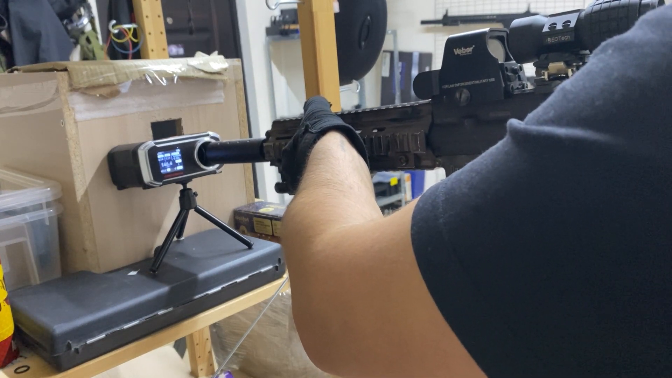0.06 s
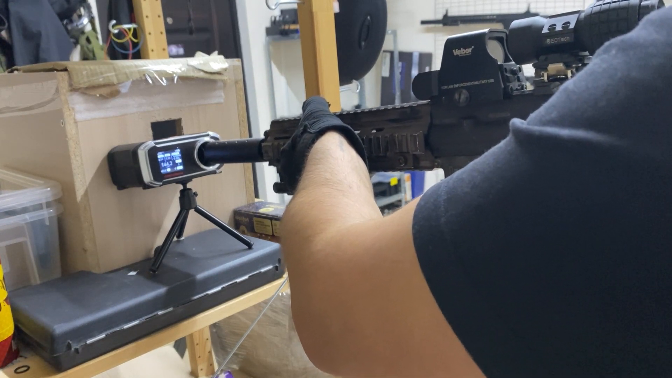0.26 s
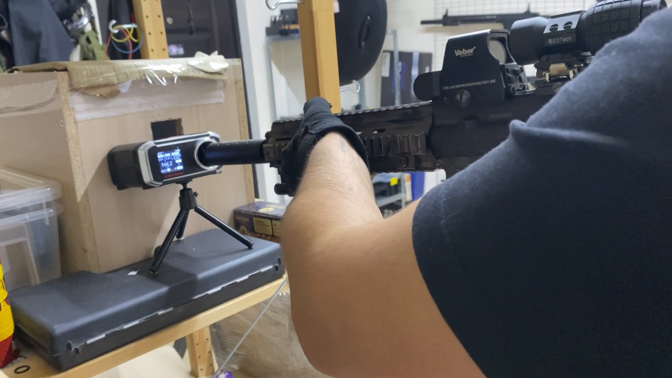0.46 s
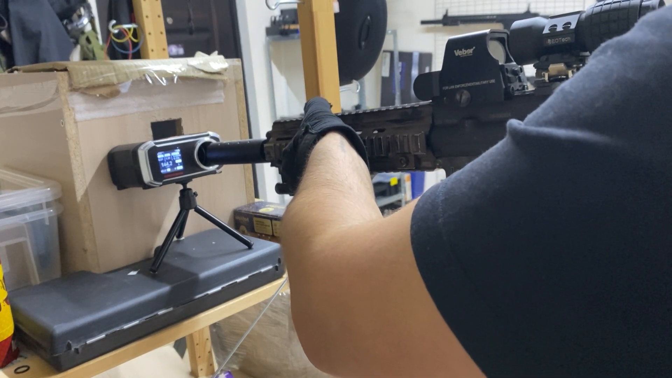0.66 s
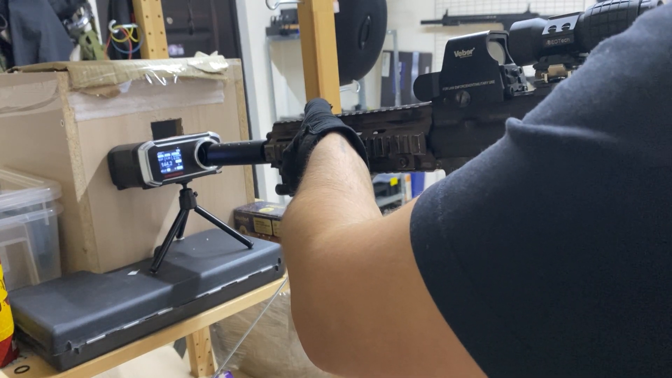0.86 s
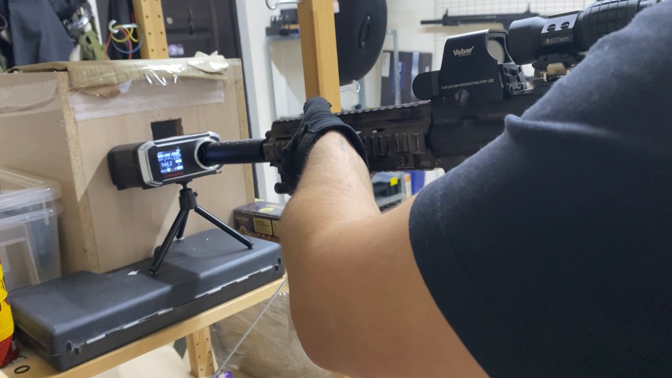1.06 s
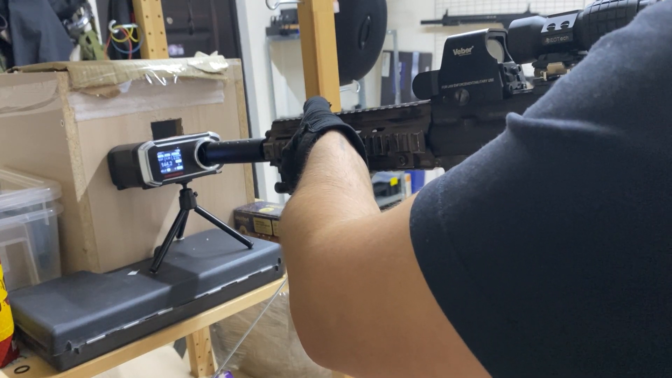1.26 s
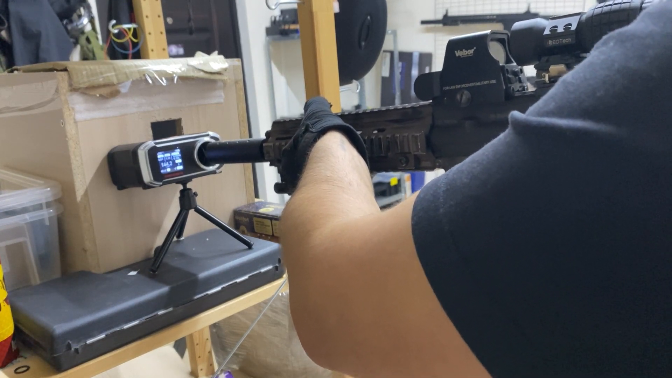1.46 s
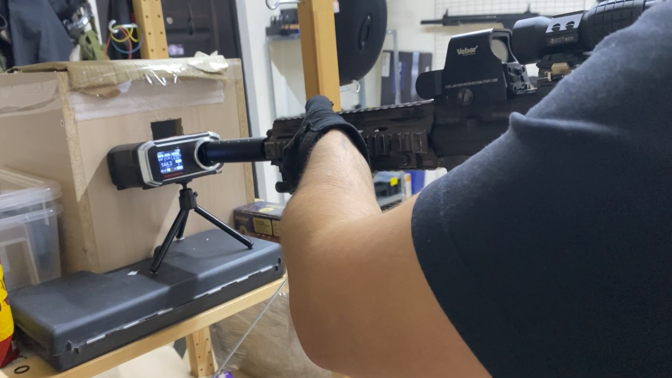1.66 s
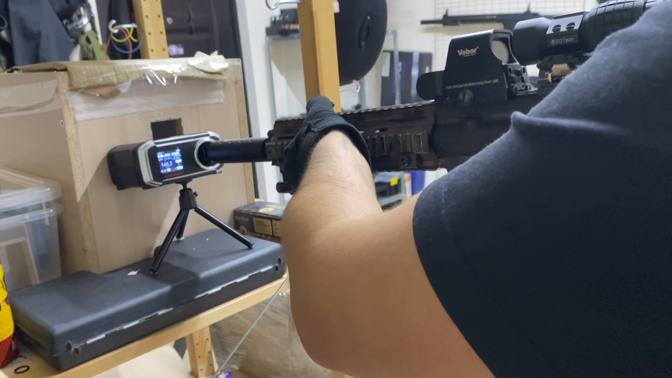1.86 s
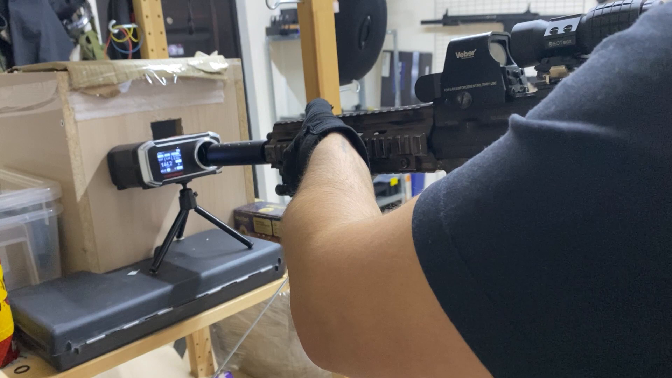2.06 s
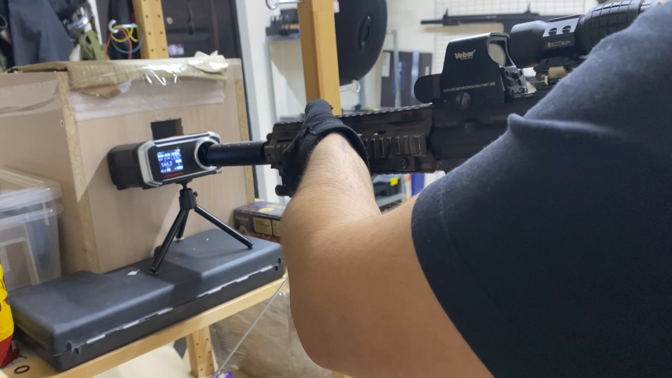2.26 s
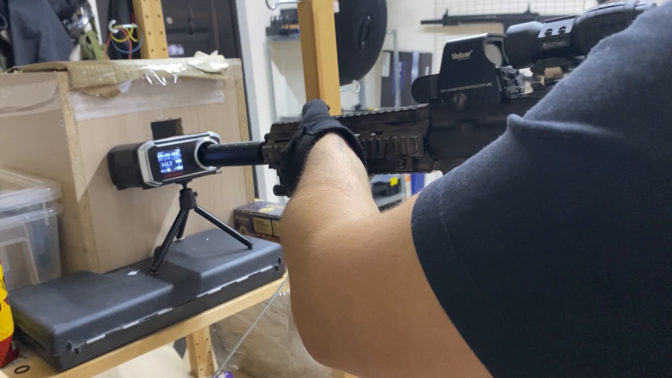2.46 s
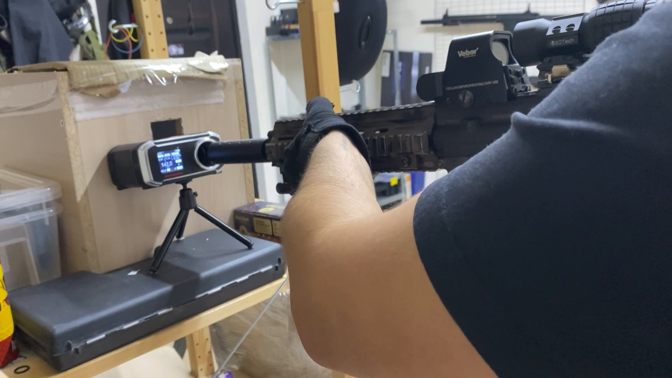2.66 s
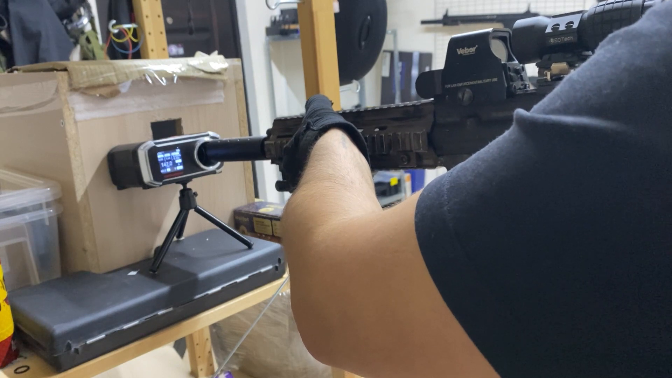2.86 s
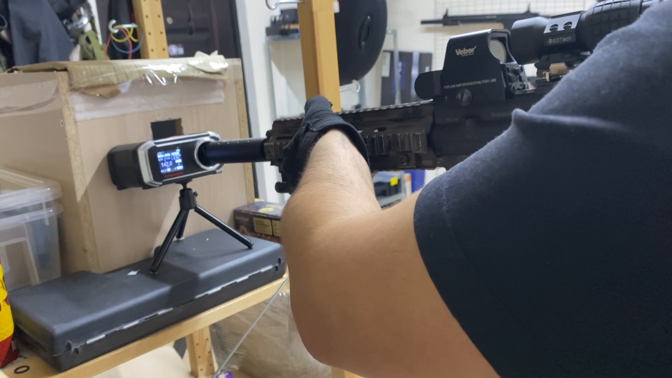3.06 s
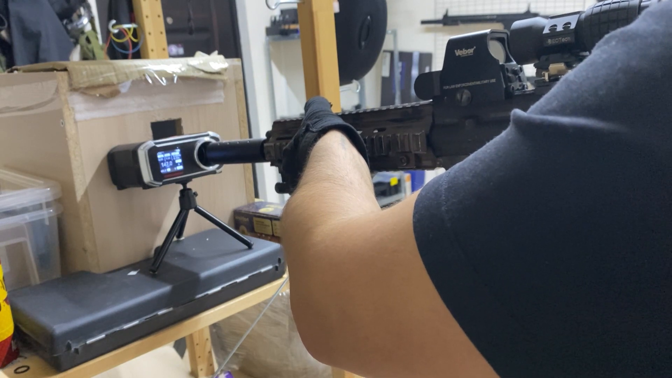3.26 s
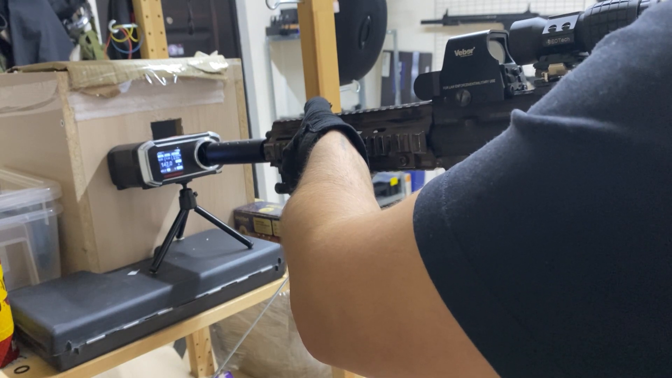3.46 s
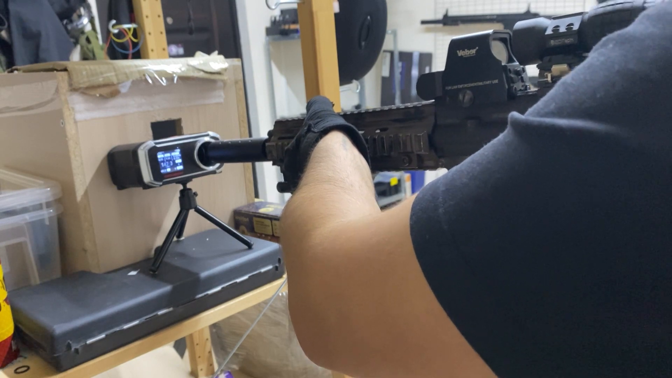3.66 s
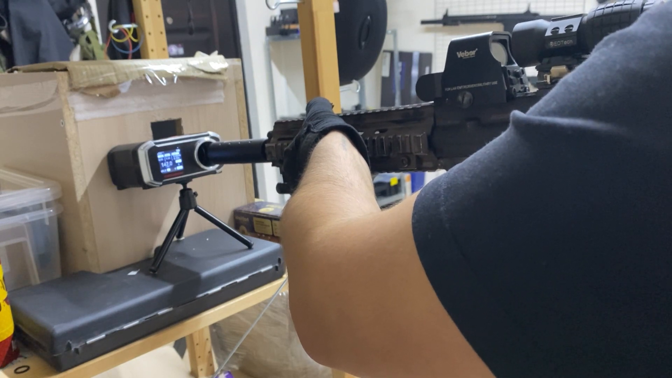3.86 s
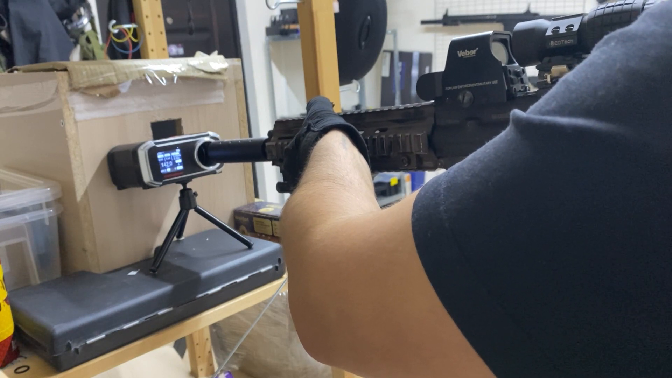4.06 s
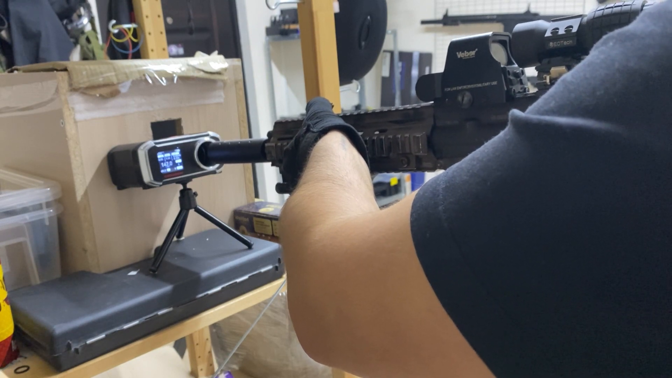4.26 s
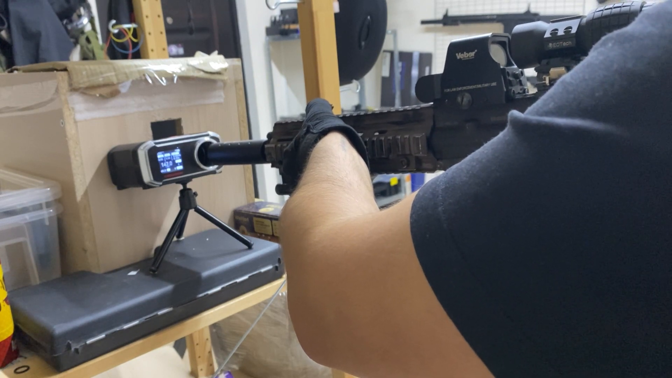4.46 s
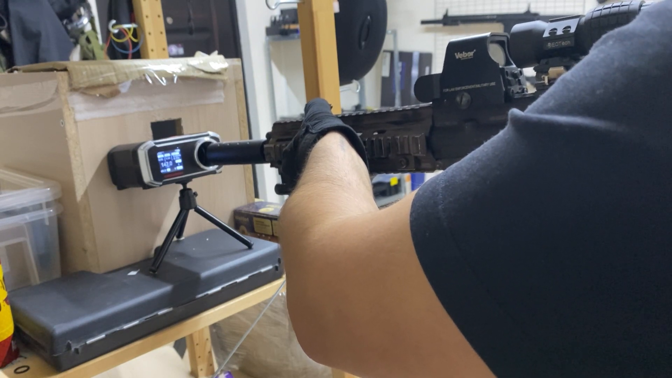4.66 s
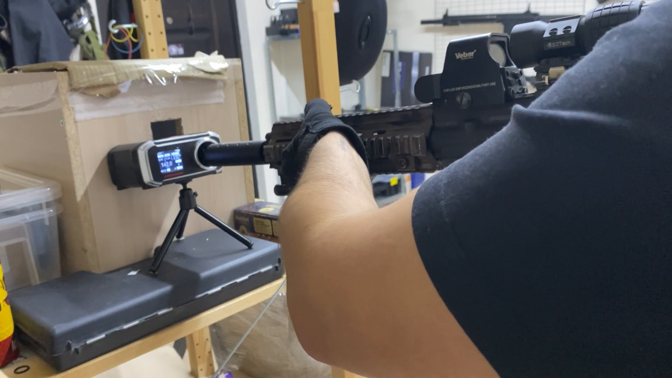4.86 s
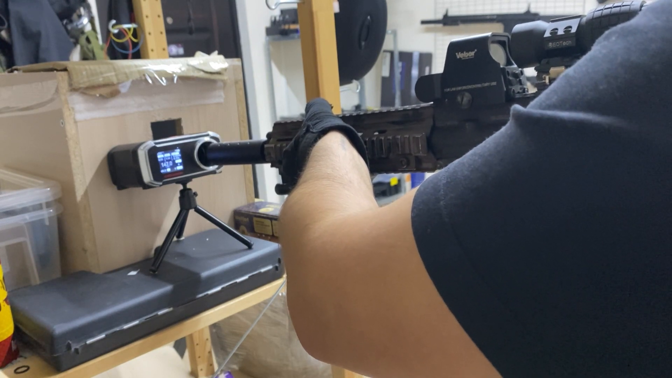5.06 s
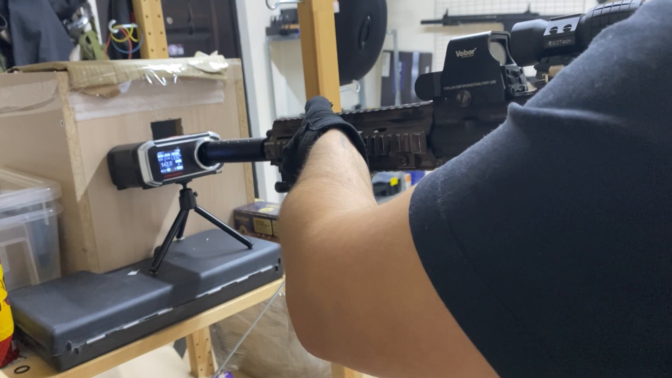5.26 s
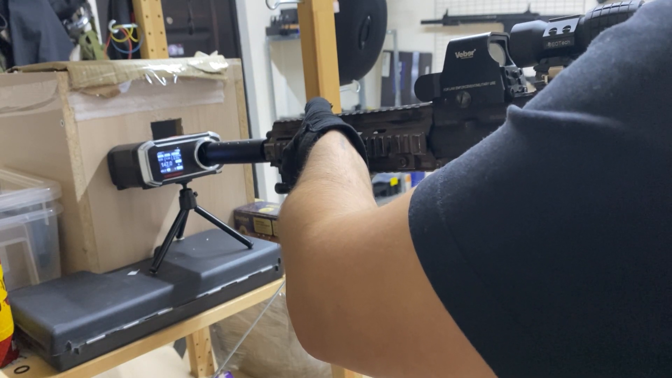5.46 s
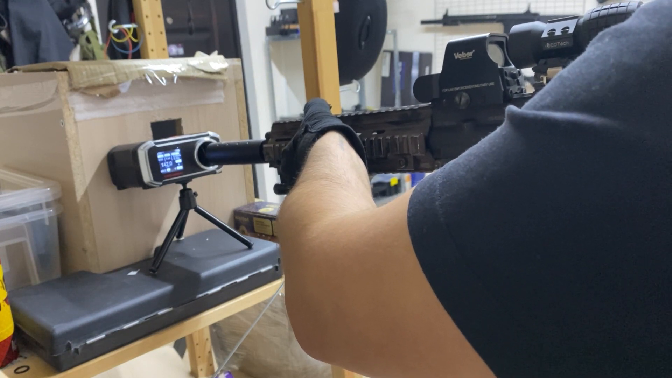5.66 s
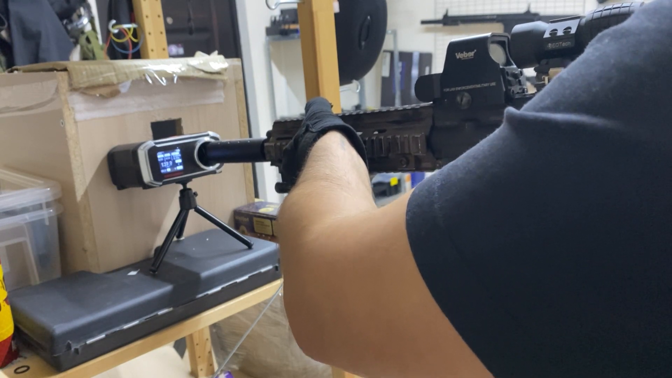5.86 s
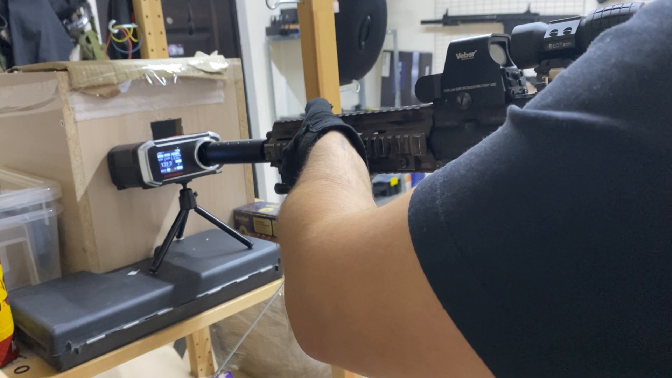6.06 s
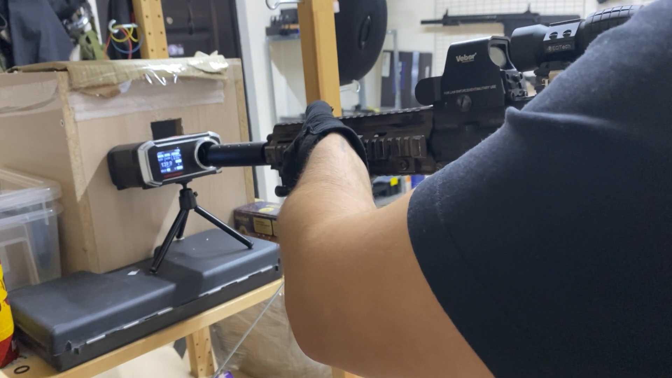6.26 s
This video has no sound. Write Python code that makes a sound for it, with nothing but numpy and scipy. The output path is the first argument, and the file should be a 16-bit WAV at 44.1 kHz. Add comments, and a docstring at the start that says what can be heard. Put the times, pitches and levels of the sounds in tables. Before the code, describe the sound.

A gas blowback replica rifle cracks six times at a steady pace, close up, each shot clattering metallically over a very faint low hum.

```python
"""In a small workshop, a gas blowback airsoft rifle fires six single shots close to a hand-held phone.
Shaped noise gives the sear's click and scrape, the hammer's blow, the gas hiss and the bolt's two impacts.
Decaying sines ring as the steel, brief sine bursts make the muzzle pop, and deeper sines make the kick.
The room answers with decaying noise and a deep swelling mode. Behind it lie still air, handling rumble
and a faint mains hum. Two microphone ports, a low cut and gain control shape the pickup."""
import sys
import numpy as np
from scipy import signal
from scipy.fft import rfft, irfft, next_fast_len
from scipy.io import wavfile
from scipy.ndimage import uniform_filter1d, minimum_filter1d, map_coordinates

SR = 44100
rng = np.random.default_rng(int(sys.argv[2]) if len(sys.argv) > 2 else 0)


def waveform_to_disk(signal):
    """Save audio, clipped to [-1, 1], as 16-bit WAV at the path in sys.argv[1]."""
    frames = np.transpose(np.atleast_2d(signal))
    scaled = np.clip(frames, -1, 1) * 32767
    samples = np.round(scaled).astype(np.int16)
    wavfile.write(sys.argv[1], SR, samples)


N = 278712  # samples in all
SPAN = SR  # samples allowed for one shot

# All levels are relative: mixing gains, the low cut and the gain control follow.
# Shots: hammer blow t/s, bolt cycle t/s, hammer level/dB, muzzle pop level/dB,
# kick level/dB as the bolt sets off, kick level/dB as it comes home
SHOTS = [(0.1606, .0692, -4.5, -0.5, -16.5, -39.5), (1.363, .0679, -9, -3.5, -28, -28.5),
         (2.4826, .0685, -9, -1.5, -34, -35.5), (3.6378, .0685, -8, -3, -30, -38),
         (4.7320, .0683, -6.5, -2, -29.5, -43.5), (5.8215, .0701, -7.5, -1.5, -30, -38)]
# Noise colour of the sear's click and scrape: f/Hz, level/dB (density per Hz)
SEAR_COLOUR = [(100, -12), (550, -0.5), (1100, -3), (1500, 5), (2100, -2.5), (3400, 1.5), (5200, -10),
               (9000, -4), (15500, -8.5)]
# Noise colour of the hammer on the valve: f/Hz, level/dB (density per Hz)
HAMMER_COLOUR = [(60, -15), (300, -11), (650, -1.5), (950, -5.5), (1400, 10), (1900, 2.5), (2500, 1),
                 (3500, -2), (5000, -13.5), (6500, -2.5), (9500, -10), (12000, -9.5), (15500, -9.5)]
# Noise colour of the gas hiss: f/Hz, level/dB (density per Hz)
GAS_COLOUR = [(100, -5), (400, 1), (900, -7.5), (1600, -1), (5000, -4.5), (7000, -0.5), (8500, -0.5),
              (10500, -0.5), (11800, -4), (13100, -1.5), (14300, -4.5), (15500, -4.5)]
# Noise colour of the bolt on its rear stop: f/Hz, level/dB (density per Hz)
BOLT_COLOUR = [(60, -15), (230, 1.5), (480, 2.5), (850, -6), (1600, 0.5), (2100, -7), (3300, 0), (4150, 7),
               (4900, -2.5), (8200, 4.5), (11000, -2.5), (15500, -7.5)]
# Noise colour of the bolt slamming home: f/Hz, level/dB (density per Hz)
BREECH_COLOUR = [(60, -14), (170, -2), (600, 1.5), (950, 1.5), (1600, 1.5), (2500, -0.5), (4400, 2),
                 (6500, 2), (10000, 0), (11500, -1.5), (15500, -4)]
# Modes of bolt and receiver, with the buffer's loud, brief clack near 4 kHz: f/Hz, level/dB, t60/s
STEEL_MODES = [(1610, -9, .55), (3060, -12, .35), (3175, -10, .35), (3950, 13, .055), (4005, -2, .26),
               (4110, 11, .04), (4177, -2, .25), (4240, 13, .05), (4318, -3, .26), (4404, -6, .2),
               (4748, -32, .9), (5759, 0, .26), (6560, -7, .28), (11125, -11, .28), (11720, -10, .28),
               (12918, -6, .22), (13093, -4, .27)]
# Time in which the workshop's answer falls by 60 dB: f/Hz, t60/s
ROOM_T60 = [(60, 0.65), (160, .6), (350, .38), (700, .42), (1500, 0.52), (4200, 0.5), (8000, 0.44),
            (15000, 0.47)]
# Colour of the workshop's answer: f/Hz, level/dB
ROOM_GAIN = [(50, -2.5), (100, -1), (150, 6.5), (205, -2.5), (260, 5.5), (400, -2.5), (700, -1),
             (950, -0.5), (1600, -1.5), (2100, -1.5), (3200, 1), (4150, 2.5), (5200, 1.5), (14000, -4)]
# Noise colour of the workshop's still air: f/Hz, level/dB (density per Hz)
AIR_COLOUR = [(20, -37), (33, -24), (44, 3.5), (54, 1), (72, -8.5), (100, -7.5), (125, -16), (165, -12),
              (220, -24), (400, -33.5), (1100, -35), (2500, -51.5), (6000, -65)]
# Noise colour of the handling rumble: f/Hz, level/dB (density per Hz)
RUMBLE_COLOUR = [(20, -26), (45, 0.5), (60, 1), (80, -9.5), (105, -0.5), (170, -15.5), (300, -33),
                 (1000, -40), (4000, -67.5)]
# Likeness of the two microphone ports: f/Hz, correlation (1 = the same)
PORT_LIKENESS = [(100, .97), (350, .6), (1000, .3), (3200, .45), (5000, .25), (7000, .5), (9000, .94),
                 (10700, .7), (12500, .9), (14200, .7), (15400, .93)]
# Phase by which the left port leads the right: f/Hz, lead/rad
PORT_LEAD = [(200, -.2), (3500, -.2), (6700, .4), (7700, 1.9), (9100, 3.1), (12100, 6.1), (12800, 6.5),
             (14700, 9), (15500, 9.4)]
# Balance of the ports: f/Hz, left minus right level/dB
PORT_LEAN = [(100, 1), (330, -5.5), (700, -2.5), (2000, -1.5), (4200, -4.5), (7000, 0.5), (12000, -0.5)]

SWING_S = .0125  # from the sear's release to the hammer's blow
REAR_SHARE = .332  # share of its cycle after which the bolt reaches the rear stop
BOTTOM_S = .0042  # from meeting the buffer to bottoming out
GAS_DB, REAR_DB, HOME_DB = -11, -7, -10  # gas hiss, rear stop, slam home: the same in every shot
BOOM_HZ, BOOM_DB, BOOM_RISE_S, BOOM_T60_S = 51.7, -44, 0.22, 1.4
JOSTLE_S, JOSTLE_DB, JOSTLE_T60_S, STEADY_HAND_DB = .2, -51, .9, -76.5
TOP_HZ = 15500  # the sound ends above this frequency


def hammer():
    """The hammer knocks the valve open: returns a very short burst of noise and the steel's ring."""
    out, ring = np.zeros((2, 2, N))
    for (s, _, db, *_), blow in zip(SHOTS, clatter(HAMMER_COLOUR, same=.5)):
        add(out, s, amp(db) * blow * fade(t60=.02, rise=.0001))
        add(ring, s, amp(db - 28.5) * steel())
    return out, ring


def bolt():
    """The bolt meets its buffer, bottoms out, and is driven home by the spring: clatter and ring."""
    out, ring = np.zeros((2, 2, N))
    bottoming = amp(-2) * fade(t60=.025, rise=.0003, delay=BOTTOM_S)
    stop = fade(t60=.014, rise=.0002) + bottoming
    slam = fade(t60=.034, rise=.0005)
    rear_noise = clatter(BOLT_COLOUR, same=0.81)
    home_noise = clatter(BREECH_COLOUR, same=0.2)
    for (s, cycle, *_), at_rear, at_home in zip(SHOTS, rear_noise, home_noise):
        rear, home = s + REAR_SHARE * cycle, s + cycle
        add(out, rear, amp(REAR_DB) * at_rear * stop)
        for blow in (rear, rear + BOTTOM_S):
            add(ring, blow, amp(REAR_DB - 23) * steel())
        add(out, home, amp(HOME_DB) * at_home * slam)
        add(ring, home, amp(HOME_DB - 27) * steel())
    return out, ring


def steel():
    """One blow on the steel: decaying modes with newly drawn strengths and phases."""
    t = np.arange(SPAN) / SR
    hz, db, t60 = np.transpose(STEEL_MODES)[:, :, None]
    size = amp(db + rng.normal(0, 1.3, db.shape) - 60 * t / t60)
    phase = np.exp(2j * np.pi * rng.random((2, len(STEEL_MODES))))  # left and right drawn apart
    return (phase @ (size * np.exp(2j * np.pi * hz * t))).imag


def muzzle(pop_hz, width, delay, left_lead, left_db, box_delay, box_db, wall_delay, wall_hz, wall_db):
    """A short hollow pop of gas, thrown back to the left by the target box and, thinner, by a near wall."""
    out = np.zeros((2, N))
    t = np.arange(SPAN) / SR

    def pop(at, hz):
        """A sine burst under a bell-shaped envelope centred at `at` seconds."""
        return np.exp(-.5 * ((t - at) / width) ** 2) * np.sin(2 * np.pi * hz * (at - t))

    for s, _, _, pop_db, *_ in SHOTS:
        hz = pop_hz * (1 + rng.normal(0, 0.045))
        right = pop(delay, hz)
        box = amp(box_db) * pop(delay + box_delay, hz)
        left = amp(left_db) * pop(delay - left_lead, hz) + box
        wall = amp(wall_db) * pop(delay + wall_delay, wall_hz)
        add(out, s, amp(pop_db) * (np.array([left, right]) + wall))
    return out


def gas():
    """Escaping gas hisses: coloured noise that rises quickly and dies away."""
    out = np.zeros((2, N))
    for (s, *_), hiss in zip(SHOTS, clatter(GAS_COLOUR, same=0.37)):
        add(out, s, amp(GAS_DB) * hiss * fade(t60=0.14, rise=0.0024))
    return out


def sear():
    """The sear clicks, then the scrape of the hammer grows as it gathers speed, up to its blow."""
    out = np.zeros((2, N))
    t = np.arange(SPAN) / SR
    click = amp(-35.5) * fade(t60=0.066, rise=0.0027)
    scrape = amp(-17) * np.exp(-np.abs(t - SWING_S) / 0.0022) * (t < SWING_S)
    for s, *_ in SHOTS:
        add(out, s - SWING_S, (click + scrape) * noise(SEAR_COLOUR, SPAN))
    return out


def recoil(thump_hz, knock_hz, knock_db, lag):
    """The rifle kicks as the bolt sets off and comes home: a deep thump and a higher knock, both short."""
    out = np.zeros((2, N))
    t = np.arange(SPAN) / SR
    thump = np.sin(2 * np.pi * thump_hz * t) * fade(t60=.065, rise=0.0048)
    knock = np.sin(2 * np.pi * knock_hz * t) * fade(t60=0.087, rise=0.0036)
    kick = thump - amp(knock_db) * knock
    for s, cycle, _, _, off_db, home_db in SHOTS:
        add(out, s + lag, amp(off_db) * kick)
        add(out, s + cycle + lag, amp(home_db) * kick)
    return out


def room(x, build):
    """The workshop's answer builds up, then each frequency dies at its own speed; tails vary by shot."""
    out = np.zeros((2, N))
    sent = filtered(x, lambda hz: amp(along(ROOM_GAIN, hz)))
    onset = 1 - np.exp(-np.arange(SPAN) / SR / build)
    for s, *_ in SHOTS:
        # one noise tail for each way from an input channel to an output channel
        hz, t, bands = signal.stft(rng.standard_normal((2, 2, SPAN)), SR, nperseg=256)
        decay = amp(-60 * t / along(ROOM_T60, hz)[:, None])
        tails = signal.istft(bands * decay, SR, nperseg=256)[1][..., :SPAN]
        tails = unit(tails * onset) / np.sqrt(2 * SPAN)
        shot = sent[:, None, round((s - SWING_S) * SR):][..., :SPAN // 2]
        add(out, s - SWING_S, signal.fftconvolve(shot, tails, axes=2).sum(axis=0))
    return out


def boom():
    """The room's lowest mode, woken by every shot, swells and slowly dies."""
    out = np.zeros((2, N))
    tone = np.sin(2 * np.pi * BOOM_HZ * np.arange(SPAN) / SR)
    mode = tone * fade(t60=BOOM_T60_S, rise=BOOM_RISE_S)
    for s, *_ in SHOTS:
        add(out, s, amp(BOOM_DB) * mode)
    return out


def handling():
    """The hand on the phone rumbles: low noise that holds, then dies away to a steady grip."""
    settling = np.maximum(np.arange(N) / SR - JOSTLE_S, 0)
    strength = amp(STEADY_HAND_DB) + amp(JOSTLE_DB - 60 * settling / JOSTLE_T60_S)
    return strength * noise(RUMBLE_COLOUR, N)


def hum(mains_hz, hum_db, waver_db):
    """An appliance hums at twice the mains frequency, its level wavering a little."""
    t = np.arange(N) / SR
    # four random points a second, smoothly joined
    waver = map_coordinates(rng.standard_normal(N // SR * 4 + 8), [t * 4])
    return amp(hum_db + waver_db * waver) * np.sin(2 * np.pi * 2 * mains_hz * t)


def background():
    """Still air as steady coloured noise, with the handling rumble and the mains hum."""
    air = amp(-62.5) * noise(AIR_COLOUR, N)
    return ports(air + handling()) + hum(mains_hz=50.7, hum_db=-62, waver_db=1.04)


def ports(pair):
    """Two unrelated signals become what the phone's two microphone ports pick up."""
    def spread(hz):
        """Mixing angle that gives the ports their likeness."""
        turn = np.arccos(np.clip(along(PORT_LIKENESS, hz), -1, 1)) / 2
        return np.array([np.cos(turn), np.sin(turn)])

    def offset(hz):
        """Half of the level and phase difference on each port."""
        half = np.array([[.5], [-.5]])
        return amp(half * along(PORT_LEAN, hz)) * np.exp(1j * half * along(PORT_LEAD, hz))

    mid, side = filtered(pair, spread)
    return filtered(np.array([mid + side, mid - side]), offset)


def clatter(spectrum, same):
    """Dense vibration of one part, for each shot: partly the same every time, partly new."""
    own = noise(spectrum, SPAN)
    return [np.sqrt(same) * own + np.sqrt(1 - same) * noise(spectrum, SPAN) for _ in SHOTS]


def amp(db):
    """Decibels to gain."""
    return 10 ** (np.asarray(db) / 20)


def unit(x):
    """x at rms 1."""
    return x / np.sqrt(np.mean(x ** 2) + 1e-20)


def along(points, hz):
    """(f/Hz, value) points read on a log frequency axis."""
    f, v = np.transpose(points)
    return np.interp(np.log(hz + 1), np.log(f + 1), v)


def filtered(x, response):
    """x times a response of frequency."""
    n = x.shape[-1]
    m = next_fast_len(n + 8192)
    return irfft(rfft(x, m) * response(np.fft.rfftfreq(m, 1 / SR)), m)[..., :n]


def noise(spectrum, size):
    """Two unrelated noises in one colour, at rms 1 overall."""
    return unit(filtered(rng.standard_normal((2, size)), lambda hz: amp(along(spectrum, hz))))


def fade(t60, rise, delay=0):
    """An envelope that waits, rises and dies away; all times in s."""
    t = np.maximum(np.arange(SPAN) / SR - delay, 0)
    return (1 - np.exp(-t / rise)) * amp(-60 * t / t60)


def add(track, s, sound):
    """Mix a sound into a track at s seconds."""
    part = track[:, round(s * SR):][:, :sound.shape[-1]]
    part += sound[..., :part.shape[-1]]


def scene():
    """The rifle close by, its room and the quiet background."""
    hammer_noise, hammer_ring = hammer()
    bolt_noise, bolt_ring = bolt()
    metal = hammer_noise + bolt_noise + gas() + sear()
    ring = hammer_ring + bolt_ring
    # times in s
    pop = muzzle(pop_hz=424, width=.0011, delay=.0052, left_lead=0.00036, left_db=-3.5,
                 box_delay=.0031, box_db=-8.5, wall_delay=0.014, wall_hz=664, wall_db=-17.5)
    kick = amp(7.5) * recoil(thump_hz=63, knock_hz=150.5, knock_db=-3, lag=.005)
    wet = amp(-4.5) * room(metal + amp(-5.5) * pop + amp(-13.5) * kick, build=0.0037)
    rifle = ports(metal + ring + wet) + pop + kick
    return amp(1) * rifle + boom() + background()


def gain_control(x, limit_db, hold, release):
    """The phone turns loud sound down at once, holds (s), then lets the gain come back (s)."""
    level = np.sqrt(np.abs(uniform_filter1d(np.mean(x ** 2, axis=0), size=256)) + 1e-12)
    need = np.minimum(1, amp(limit_db) / level)
    h, r = int(hold * SR / 2), int(release * SR / 2)
    # the origins make both windows look back in time
    held = minimum_filter1d(need, 2 * h + 1, origin=h)
    recovering = uniform_filter1d(held, 2 * r + 1, origin=r)
    return x * uniform_filter1d(np.minimum(held, recovering), size=64)


def record(dry):
    """Low cut, gain control, rounded peaks, and nothing above TOP_HZ."""
    x = signal.sosfilt(signal.butter(3, 34, "highpass", fs=SR, output="sos"), dry)
    x = gain_control(x, limit_db=-10.5, hold=0.17, release=0.016)
    x = x / (1 + np.abs(x) ** 6) ** (1 / 6)
    return filtered(x, lambda hz: 1 / (1 + (hz / TOP_HZ) ** 120))


dry = scene()
out = record(dry)
waveform_to_disk(out)
```